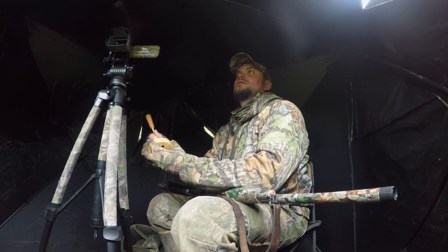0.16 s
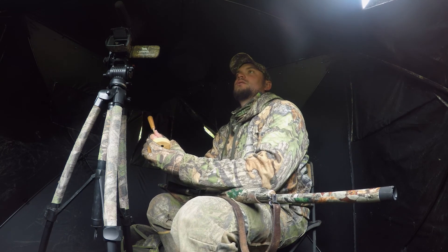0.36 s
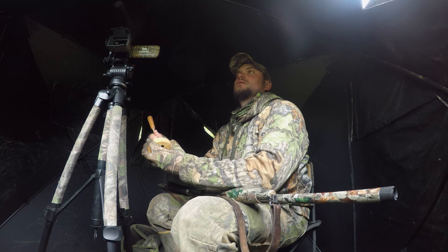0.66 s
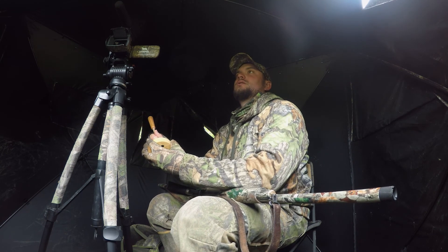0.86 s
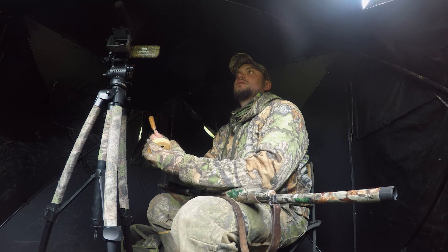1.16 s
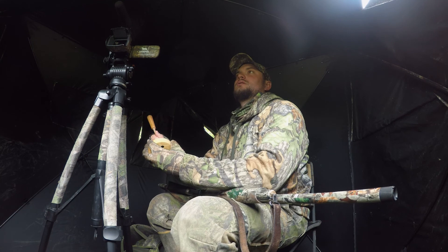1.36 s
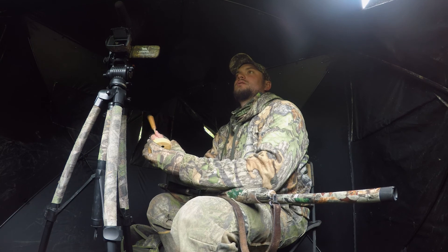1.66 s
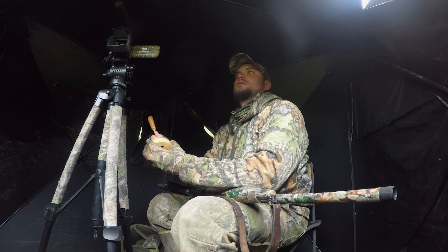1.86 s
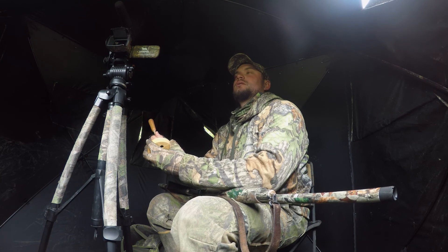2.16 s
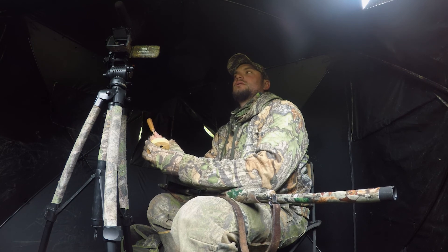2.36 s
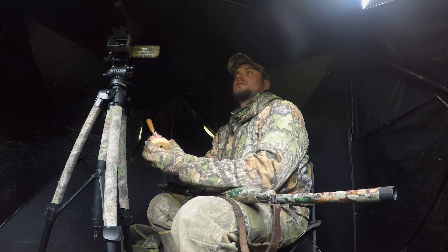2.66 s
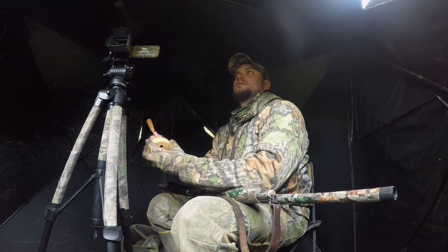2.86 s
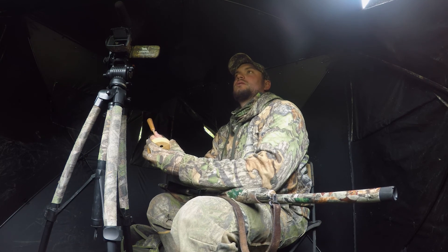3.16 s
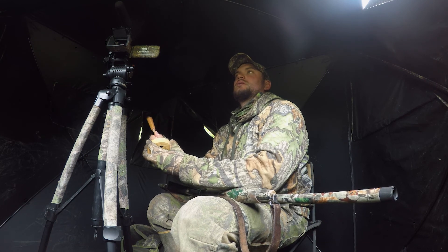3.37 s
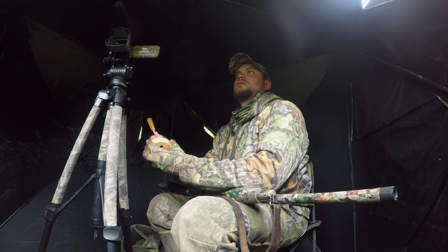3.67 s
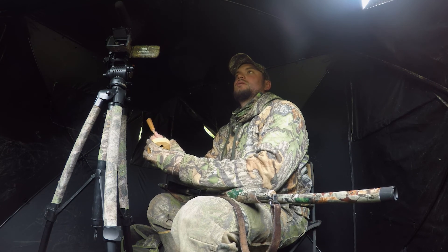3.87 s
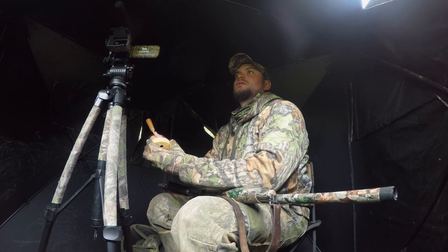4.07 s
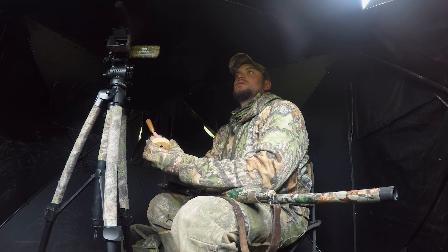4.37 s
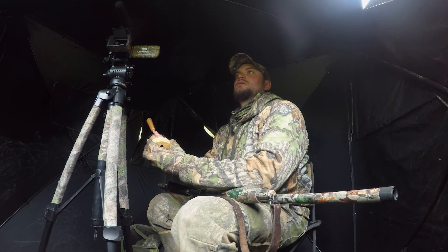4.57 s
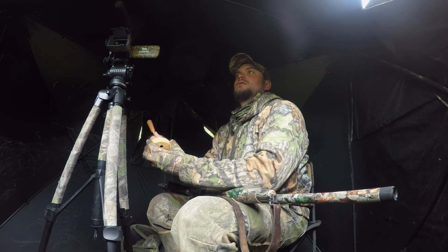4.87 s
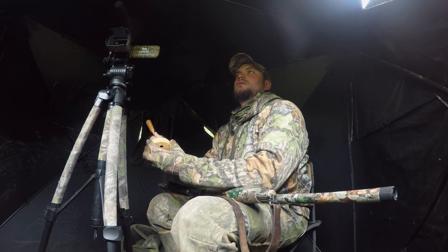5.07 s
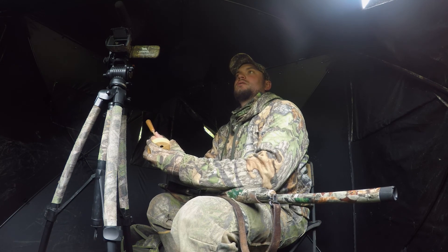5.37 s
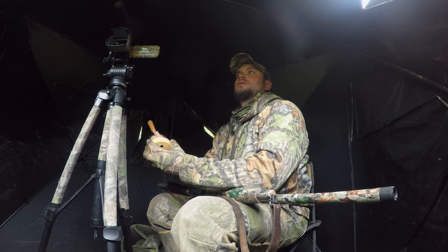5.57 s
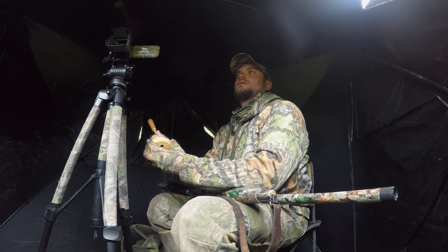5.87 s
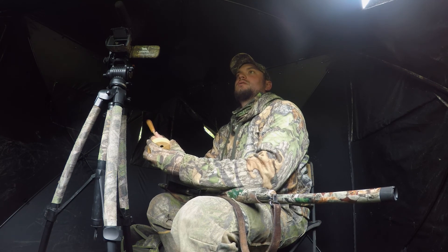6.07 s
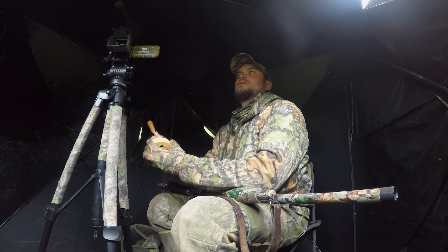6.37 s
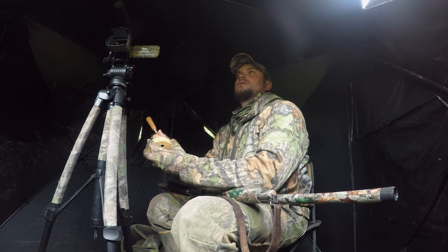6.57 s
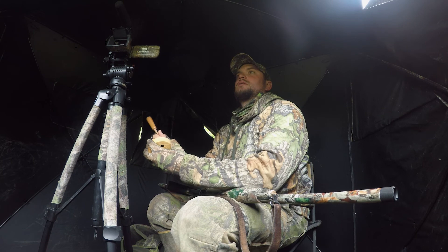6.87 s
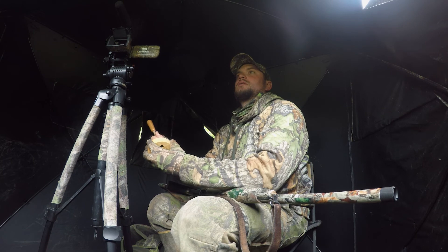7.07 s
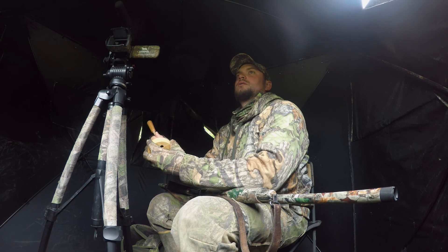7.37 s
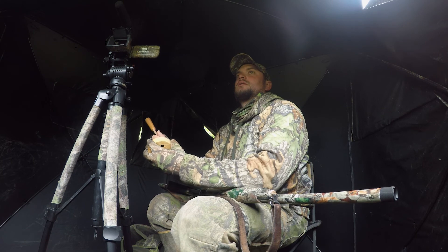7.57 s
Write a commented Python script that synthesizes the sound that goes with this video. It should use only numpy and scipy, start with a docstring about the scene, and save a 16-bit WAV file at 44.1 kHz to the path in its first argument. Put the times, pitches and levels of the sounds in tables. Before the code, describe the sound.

Inside a fabric hunting blind, a striker on a slate turkey call makes six sharp clucks, then nine raspy, steadily strengthening yelps over faint hush.

```python
"""Inside a fabric blind in the woods, a hunter plays a slate turkey call: six sharp clucks, then nine yelps.
Stick-slip friction drives the call: pulses of the striker, clean or raspy, ring the modes of slate and pot.
Between strokes the light striker whispers as filtered noise. Decaying noise tails give the blind a short
ring, the woods a faint long one and the trees one blurred echo; a slowly swelling hush lies under it all."""
import sys
import numpy as np
from scipy import signal
from scipy.fft import rfft, irfft
from scipy.io import wavfile
from scipy.ndimage import uniform_filter1d, minimum_filter1d

SR = 44100
rng = np.random.default_rng(int(sys.argv[2]) if len(sys.argv) > 2 else 0)


def bounce(signal):
    """Save signal as a 16-bit WAV file at the path given by the first command-line argument."""
    frames = np.transpose(np.atleast_2d(signal))
    limited = np.clip(frames, -1, 1)
    pcm = np.round(limited * 32767).astype(np.int16)
    wavfile.write(sys.argv[1], SR, pcm)


N = 340452

LEAD_S, TAIL_S = .025, .02  # margins computed before the catch and after the end of a stroke


def gain_of(db):
    """Level to amplitude: 20 dB is a factor of ten."""
    return 10 ** (np.asarray(db) / 20)


def evened(x):
    """Normalization of signal power: scales to rms 1."""
    return x / np.sqrt(np.mean(x ** 2) + 1e-20)


def read(points, hz):
    """Linear interpolation of (f/Hz, value) points on a logarithmic frequency axis."""
    f, value = np.transpose(points)
    return np.interp(np.log(hz + 1), np.log(f + 1), value)


def blend(a, b, share):
    """Linear interpolation from a to b as share goes from 0 to 1."""
    return a + (b - a) * share


def add(mix, s, sound):
    """Superposition: adds a sound to the mix from time s on."""
    part = mix[:, round(s * SR):][:, :sound.shape[-1]]
    part += sound[..., :part.shape[1]]


def wander(size, hz):
    """Low-passed noise: random motion of about rms 1, weak above hz."""
    f = np.fft.rfftfreq(SR, 1 / SR)
    spectrum = rfft(rng.standard_normal(SR)) / (1 + (f / hz) ** 4)
    return evened(irfft(spectrum))[:size]


def hush():
    """Partly coherent filtered noise: distant air in the trees over the hiss of the microphones."""
    # spectrum of the hush: f/Hz, relative level/dB
    colour = [(20, -20), (60, -22.5), (106, -32.5), (140, -1), (200, -1), (300, -6.5), (500, -8.5),
              (1000, -10), (2000, -20.5), (4500, -28.5), (7000, -26), (10000, -27.5), (13000, -36.5),
              (15000, -38)]
    # left-right likeness: f/Hz, correlation (-1 to 1)
    likeness = [(30, 0.88), (100, 0.78), (160, 0.35), (260, -0.24), (500, -0.68), (1000, -0.81),
                (3000, -0.099), (12000, -0.083)]
    # slow rise and fall of the hush: t/s, level change/dB
    swell = [(0, 0.5), (1.7, -1.5), (2.4, 0), (4, 0), (5.8, 1), (6.5, -4.5), (7.1, -3), (7.7, -2.5)]
    level_db = -48.5
    hz = np.fft.rfftfreq(N, 1 / SR)
    a, b = rfft(rng.standard_normal((2, N)))
    alike = np.clip(read(likeness, hz), -1, 1)
    pair = np.array([a, alike * a + np.sqrt(1 - alike ** 2) * b])
    air = irfft(pair * gain_of(read(colour, hz)), N)
    swell_db = np.interp(np.arange(N) / SR, *np.transpose(swell))
    return gain_of(level_db + swell_db) * evened(air)


def reverberate(x, t60, colour, delay, build):
    """Diffuse reverberation: reflections build up after a delay and decay exponentially band by band."""
    size = 2 * SR
    hz, t, z = signal.stft(rng.standard_normal((2, size)), SR, nperseg=512)
    decay = gain_of(-60 * t / read(t60, hz)[:, None])
    tail = signal.istft(z * decay, SR)[1][:, :size]
    tail *= np.clip((np.arange(size) / SR - delay) / build, 0, 1)
    tail /= np.linalg.norm(tail[0])
    tail = irfft(rfft(tail) * gain_of(read(colour, np.fft.rfftfreq(size, 1 / SR))))
    return signal.fftconvolve(x, tail, axes=1)[:, :N]


def striker_whisper(length, db):
    """Light friction noise: the unloaded tip whispers over the slate's grain."""
    # spectrum of the whisper: f/Hz, relative level/dB
    colour = [(600, -36), (1500, -2), (2000, -7.5), (2500, -1.5), (4200, -16), (5200, -1), (5700, -8.5),
              (6700, -5), (8200, -12.5), (12000, -32.5)]
    size = round(length * SR)
    noise = rfft(rng.standard_normal((2, SR)))
    hiss = irfft(noise * gain_of(read(colour, np.fft.rfftfreq(SR, 1 / SR))))
    flutter_db = 2.5 * wander(size, 90)
    return gain_of(db + flutter_db) * evened(hiss)[:, :size] * signal.windows.tukey(size, .8)


def pot_response(size=4096):
    """Modal resonance from a minimum-phase core, with unequal level and phase at left and right microphone."""
    # modes of slate, pot and striker: f/Hz, least width scale/Hz, level/dB, left-right level/dB, left lead/rad
    modes = np.array([(720, 400, -16.5, -4, .5), (1052, 250, -3, -2, 1.64), (1165, 87, -6, 3, -3),
                      (1265, 190, -2, 3.5, 1.32), (1408, 99, -5.5, 0.5, -2), (1438, 100, -1, -7, -1.43),
                      (1609, 26, -0.5, 2.5, 2.08), (1759, 84, -4, 0, 1), (2094, 37, -15.5, -4, 0.4),
                      (2335, 190, -7, 2, 0.33), (2567, 310, -2.5, 1.5, 0.67), (2776, 69, -15, 2.5, 0),
                      (3158, 470, -15.5, 2, 1.2), (3554, 150, -16.5, 3, 1.34), (4030, 110, -34.5, 0.5, 0.9),
                      (5110, 313, -14.5, 2, -0.9), (5640, 83, -25, 5, 0.9), (6345, 180, -22.5, -1, 1.5),
                      (7066, 100, -23.5, -0.5, 0), (7520, 160, -32, -14.5, 2.5), (8080, 670, -35, -3, 1),
                      (9060, 740, -36.5, -4, 2)])
    # broad response between the modes: f/Hz, level/dB
    between = [(200, -81.5), (450, -46), (620, -27.5), (1100, -27), (1950, -41.5), (3000, -24.5),
               (4500, -29.5), (7000, -31.5), (10000, -58.5), (12000, -62.5), (15000, -70.5)]
    # dips where neighbouring modes cancel: f/Hz, width scale/Hz, depth/dB
    notches = [(1185, 26, -8), (1880, 78, -4), (2815, 80, -4.5)]
    hz = np.fft.rfftfreq(size, 1 / SR)
    widths = np.maximum(modes[:, 1], modes[:, 0] / 26)
    peaks = sum(gain_of(db) ** 2 / (1 + 2 * ((hz - f) / width) ** 2) ** 3
                for f, width, db in zip(modes[:, 0], widths, modes[:, 2]))
    log_gain = np.log(peaks + gain_of(read(between, hz)) ** 2) / 2
    notch_db = sum(db * np.exp(-((hz - f) / width) ** 2) for f, width, db in notches)
    log_gain += np.log(gain_of(notch_db))
    # minimum phase follows from the Hilbert transform of the log gain
    phase = -signal.hilbert(np.r_[log_gain, log_gain[-2:0:-1]]).imag[:len(hz)]
    # each mode radiates in its own pattern, so the two microphones get it unequally
    side = gain_of(read(modes[:, [0, 3]], hz) / 2) * np.exp(.5j * read(modes[:, [0, 4]], hz))
    both = np.exp(log_gain + 1j * phase) * np.array([side, 1 / side])
    return np.fft.fftshift(irfft(both), axes=1)


def locked(hz):
    """Frequency locking: strong modes capture the slip rate, hold it, then let it jump away."""
    # slip rates whose octave sits on a strong mode: f/Hz, reach/Hz
    locks = [(622, 55), (720, 19.9)]
    for centre, reach in locks:
        hz = hz - (hz - centre) * np.exp(-((hz - centre) / reach) ** 4)
    return hz


def upturn(hz, lift):
    """Friction eases with pressure: the slip rate swings up and levels off at its free value."""
    free_hz = 924.3
    return blend(hz, free_hz, np.sin(np.pi / 2 * lift) ** 2)


def press(drive, level_db, pot):
    """Forced vibration: rings the pot, the hand pressing as hard as each moment's loudness needs."""
    lead = pot.shape[1] // 2
    drive = drive * gain_of(level_db)
    heard = signal.fftconvolve(drive, pot.mean(0))[lead:][:len(drive)]
    wanted, got = (uniform_filter1d(v ** 2, size=260) + 1e-10 for v in (gain_of(level_db), heard))
    drive = drive * uniform_filter1d(np.sqrt(wanted / got), size=160)
    return signal.fftconvolve(drive[None], pot, axes=1)[:, lead:]


def stroke(t, hz, low_db, high_db, rasp, bite, pot, waver=.0035, waver_hz=200, lurch=0.02, jitter=0.069,
           jitter_hz=450, shimmer=0.16, grit_db=-7, clean_grit_db=-22, pivot_hz=2300, soft_start_db=-6,
           settle=0.0048):
    """Stick-slip oscillation: a smooth fundamental, and overtones that rasp breaks into a grind."""
    hz, rasp, size = locked(hz), np.clip(rasp, 0, 1), len(t)
    # the slips start rounded and sharpen within a few cycles
    bite = bite + soft_start_db * np.exp(-np.maximum(t, 0) / settle)
    turns = np.cumsum(hz * (1 + (waver + lurch * rasp) * wander(size, waver_hz))) / SR
    # with rasp each slip comes a little early or late, which smears the high overtones most
    stray = jitter * rasp * wander(size, jitter_hz)
    slips = np.zeros(size)
    for k in range(2, 22):
        octaves = np.log2(np.minimum(k * hz, 6000) / pivot_hz)
        slips += gain_of(bite * octaves) * np.cos(2 * np.pi * (k * turns + (k - 3 / 2) * stray))
    slips *= (1 + shimmer * rasp * wander(size, 300)) / np.pi
    # the slate's grain hisses after every slip, brighter as the tip bites
    after_slip = 0.53 + np.exp(-(turns % 1) / 0.34)
    grain = evened(after_slip * rng.standard_normal(SR)[:size])
    dull = signal.sosfilt(signal.butter(2, [1600, 3200], "band", fs=SR, output="sos"), grain)
    keen = signal.sosfilt(signal.butter(3, 3200, "high", fs=SR, output="sos"), grain)
    keen = gain_of(.9 * bite) * keen
    grit = gain_of(grit_db) * rasp * (dull + keen) + gain_of(clean_grit_db) * keen
    return press(np.cos(2 * np.pi * turns), low_db, pot) + press(slips + grit, high_db, pot)


def phases(length, break_s, snap_s, lift_s):
    """Change of friction regime: time from the catch, shares 0-1 of the break and the easing of the hand."""
    t = np.arange(-LEAD_S, length + TAIL_S, 1 / SR)
    broken = (1 + np.tanh((t - break_s) / (2 * snap_s))) / 2
    lift = np.clip(1 + (t - length) / lift_s, 0, 1) ** 1.6
    return t, broken, lift


def envelopes(t, length, hz, lift, rasp, attack_s, touch_db_per_s):
    """Onset and decay of friction: levels in dB of fundamental and overtones through touch, catch and release."""
    # strength of the fundamental at each slip rate: f/Hz, level/dB
    fundamental = [(590, -37.5), (645, -36.5), (710, -30.5), (780, -27.5), (830, -31.5), (870, -21.5),
                   (930, -17.5), (1000, -21)]
    catch_db, fundamental_catch_db = -27, -7.5  # at the instant the tip catches
    release_db_per_s, fundamental_release_db_per_s = 1700, 3001
    grind_db, lift_db = -4.5, -14  # what full rasp and full easing take from the fundamental
    touch_db, after = touch_db_per_s * np.minimum(t, 0), np.maximum(t - length, 0)
    catching = np.clip(1 - t / attack_s, 0, 1) ** 2
    low_db = (read(fundamental, hz) + fundamental_catch_db * catching - fundamental_release_db_per_s * after
              + blend(grind_db * rasp, lift_db, lift ** 2))
    high_db = catch_db * catching - release_db_per_s * after
    return low_db + touch_db, high_db + touch_db


def cluck(pot, length, db, fundamental_db, first_hz, low_hz, low_rasp, bite):
    """Abrupt stick-slip transient: a jab whose pitch breaks at once into a grind and springs back up."""
    first_rasp, lift_db, jab_db, lift_bite_db = 0.18, -7, 4, -6  # bite in dB per octave
    t, broken, lift = phases(length, break_s=.008, snap_s=.0015, lift_s=.022)
    hz = upturn(blend(first_hz, low_hz, broken), lift)
    rasp = blend(first_rasp, low_rasp, broken * (1 - lift ** 2 / 2))
    low_db, high_db = envelopes(t, length, hz, lift, rasp, attack_s=0.0033, touch_db_per_s=4201)
    low_db = low_db + fundamental_db + jab_db * (1 - broken)
    high_db = high_db + db + lift_db * lift
    return stroke(t, hz, low_db, high_db, rasp, bite + lift_bite_db * lift, pot)


def yelp(pot, length, attack_s, break_s, high_hz, glide, low_hz, high_note_db, low_note_db, low_rasp, low_bite):
    """Pressure-dependent stick-slip: a pull glides high, breaks to a low note and turns up as the hand eases."""
    # a high note at full pressure is clean and bright; each dB softer makes it scratchier and duller
    full_db, high_rasp, high_bite, rasp_per_db, bite_per_db = -12, 0.037, 1.0, 0.05, 0.79
    entry_sharp_hz, entry_s = 84.63, 0.0071  # a yelp starts sharp and settles as the tip digs in
    lift_rasp, lift_db, lift_bite_db = .3, -5, -6  # bite in dB per octave
    fundamental_follows = 0.21  # share of the level below full that the fundamental follows
    t, broken, lift = phases(length, break_s, snap_s=0.0021, lift_s=.03)
    held, softer_db = np.maximum(t, 0), full_db - high_note_db
    high_note = high_hz + glide * held + entry_sharp_hz * np.exp(-held / entry_s)
    hz = upturn(blend(high_note, low_hz, broken), lift)
    db = blend(high_note_db, low_note_db, broken)
    rasp = blend(high_rasp + rasp_per_db * softer_db, low_rasp, broken) + lift_rasp * lift
    bite = blend(high_bite - bite_per_db * softer_db, low_bite, broken) + lift_bite_db * lift ** 2
    low_db, high_db = envelopes(t, length, hz, lift, rasp, attack_s, touch_db_per_s=2200)
    low_db = low_db + fundamental_follows * (db - full_db)
    high_db = high_db + db + lift_db * lift
    return stroke(t, hz, low_db, high_db, rasp, bite, pot)


def scene():
    """Superposition of direct sound, reverberation and background: the call, its echoes and the hush."""
    # clucks, short jabs: start t/s, length/s, relative level/dB, fundamental change/dB,
    # first f/Hz, lowest f/Hz, rasp (0-1), bite/(dB per octave)
    clucks = [(0.160, 0.034, -13, 0, 882, 641.6, 0.77, 2), (0.9294, 0.04, -13.5, 0.5, 887, 628, 0.96, 2),
              (1.2768, 0.034, -12.5, 2.5, 868, 628, 0.88, 2), (1.6573, 0.036, -12.5, 2, 870, 633, 1, 1.5),
              (3.3706, .039, -12, 2, 873, 628.4, 1, 1.5), (4.5406, 0.031, -16.5, -2.5, 797, 598, 0.66, -1)]
    # yelps, longer pulls: start t/s, length/s, attack/s, break after/s, high note f/Hz, its glide/(Hz per s),
    # low note f/Hz, high note relative level/dB, low note relative level/dB, rasp (0-1), bite/(dB per octave)
    yelps = [(4.861, 0.1, 0.019, 0.072, 749.4, 1498.5, 676, -28, -18.5, 0.25, -1.5),
             (5.202, 0.085, 0.012, 0.021, 741, -1200, 736.6, -19, -14.5, 0.26, -2),
             (5.514, 0.09, 0.011, .021, 793, -1400, 699.2, -19.5, -14.5, 0.17, -1),
             (5.828, 0.098, 0.011, .040, 841.4, -2200, 698.5, -16.5, -14.5, 0.19, -0.5),
             (6.151, 0.092, .011, 0.055, 856, -800, 725, -12.5, -17.5, 1, -1),
             (6.447, 0.11, 0.019, 0.059, 873, -1100, 791, -12.5, -17, 0.42, -0.5),
             (6.787, 0.086, 0.011, .045, 851.4, -750, 668, -13, -17, 1, 0),
             (7.128, 0.083, 0.017, 0.043, 874, -1300, 806.4, -12, -15, 0.07, 0),
             (7.453, 0.091, 0.018, 0.046, 894, -2400, 642, -14, -17, 0.72, -1)]
    # light striker noises, mostly slides back, with one faint touch and one short tick:
    # middle t/s, length/s, relative level/dB
    whispers = [(0.351, 0.14, -54), (1.042, 0.1, -53), (1.253, 0.04, -62), (1.408, 0.14, -57),
                (1.789, 0.091, -58), (2.334, 0.021, -54), (3.498, 0.079, -54.5), (4.438, .012, -61),
                (4.694, 0.1, -55.5), (5.07, 0.19, -59.5), (5.39, 0.13, -53), (5.713, 0.11, -50.5),
                (6.028, 0.15, -51), (6.33, 0.12, -53), (6.645, 0.18, -57), (6.979, 0.2, -57),
                (7.301, .1, -57), (7.655, 0.17, -58)]
    # decay times in the blind and the woods: f/Hz, T60/s
    blind_t60 = [(600, 0.16), (1300, 0.095), (2500, 0.11), (5000, 0.13), (10000, 0.024)]
    woods_t60 = [(600, .6), (1100, 1.7), (1260, 1), (1390, .8), (2200, 0.33), (6000, .5), (12000, 0.44)]
    # colour of the reflections from blind, woods and tree line: f/Hz, relative level/dB
    blind_colour = [(800, -30), (1400, -12.5), (2500, -18), (3400, -7.5), (4300, -7), (5100, -9.5),
                    (6200, -0.5), (8000, -3.5)]
    woods_colour = [(600, -36), (1000, -9.5), (1210, 1.5), (1310, -1), (1430, -5.5), (1800, -10),
                    (2500, -12), (5000, -9), (10000, -36.5)]
    tree_colour = [(600, -28.5), (1050, -23), (1250, -4), (1500, -7.5), (1900, -23), (2500, -11.5),
                   (5000, -20), (10000, -40)]
    call, pot = np.zeros((2, N)), pot_response()
    for s, *row in clucks:
        add(call, s - LEAD_S, cluck(pot, *row))
    for s, *row in yelps:
        add(call, s - LEAD_S, yelp(pot, *row))
    for s, length, db in whispers:
        add(call, s - length / 2, striker_whisper(length, db))
    # fabric walls let the low notes out and throw the treble back
    blind = reverberate(call, blind_t60, blind_colour, delay=0.0039, build=.002)
    woods = reverberate(call, woods_t60, woods_colour, delay=.02, build=.03)
    # a line of trees sends one blurred echo back
    tree_t60 = [(600, 0.33), (1300, .45), (8000, 0.68)]  # f/Hz, T60/s
    trees = reverberate(call, tree_t60, tree_colour, delay=0.11, build=0.0089)
    return gain_of(-0.9) * call + blind + gain_of(-33) * woods + gain_of(-32.5) * trees + hush()


def record(dry):
    """Peak limiting and band limiting: a quick limiter holds the sharpest peaks, then a low-pass filter."""
    ceiling, edge_hz = .72, 15100
    allowed = np.minimum(ceiling / (abs(dry).max(0) + 1e-9), 1)
    held = dry * uniform_filter1d(minimum_filter1d(allowed, size=200), size=200)
    low_pass = signal.firwin(511, edge_hz, window=("kaiser", 9), fs=SR)
    return signal.oaconvolve(held, low_pass[None], "same")


dry = scene()
out = record(dry)
bounce(out)
```